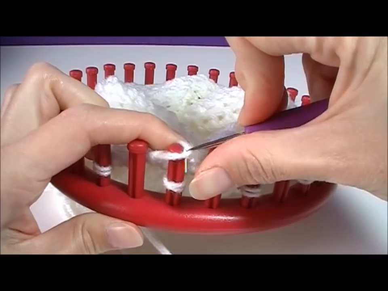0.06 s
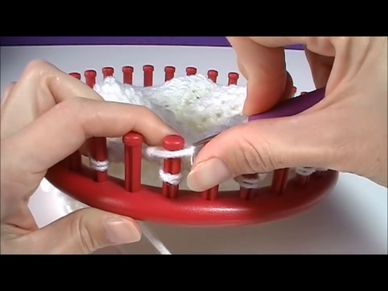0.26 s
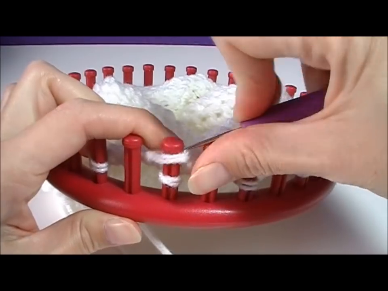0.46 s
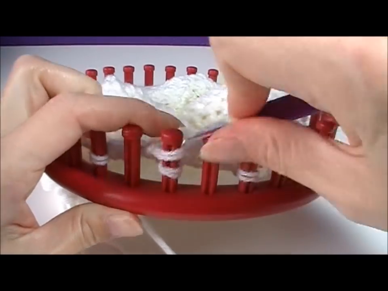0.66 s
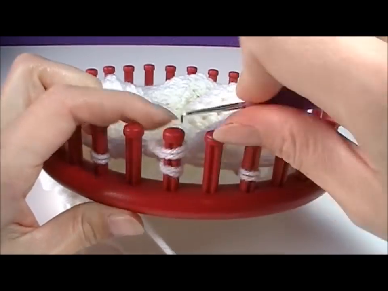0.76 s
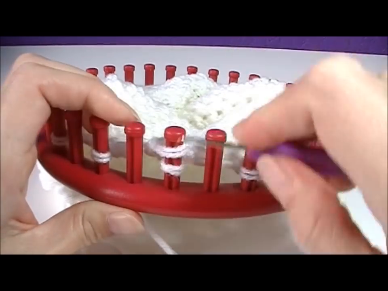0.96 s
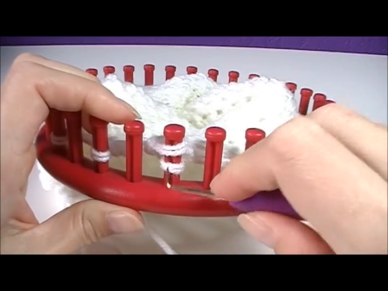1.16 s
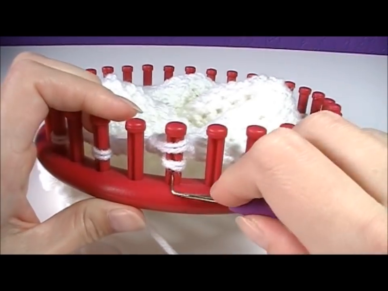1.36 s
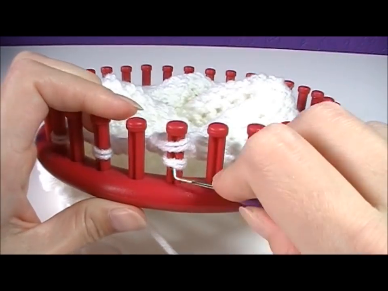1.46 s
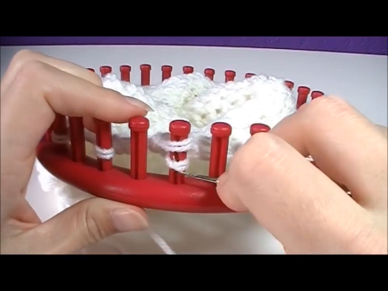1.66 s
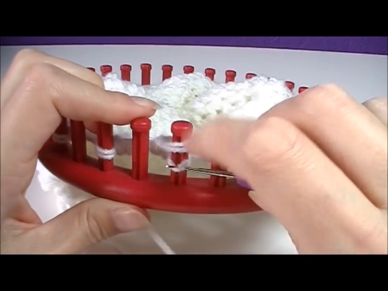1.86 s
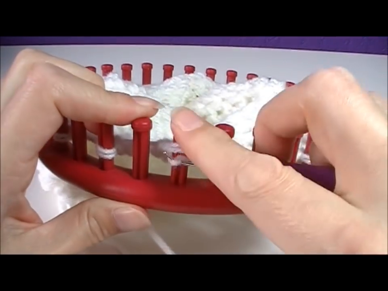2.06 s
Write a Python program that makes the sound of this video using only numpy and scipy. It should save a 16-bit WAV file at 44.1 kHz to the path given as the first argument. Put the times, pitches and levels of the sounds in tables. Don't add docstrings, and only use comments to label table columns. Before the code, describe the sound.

A metal hook ticks on plastic pegs close up: one loud sharp snap with a woody table boom near the start, a smaller click, then faint taps, knocks and yarn rustle in a quiet, hissy room.

```python
import sys
import numpy as np
from scipy import signal
from scipy.fft import rfft, irfft, next_fast_len
from scipy.io import wavfile
from scipy.ndimage import map_coordinates

SR = 44100
rng = np.random.default_rng(int(sys.argv[2]) if len(sys.argv) > 2 else 0)


def attenuation_scalar(level_db):
    decades = np.asarray(level_db, float) / 20
    return 10 ** decades


def wav_record(signal):
    frames = np.transpose(np.atleast_2d(signal))
    bounded = np.clip(frames, -1, 1)
    quanta = np.round(bounded * 32767).astype(np.int16)
    wavfile.write(sys.argv[1], SR, quanta)


N = 92610
BAND_TOP_HZ = 15500


def unit(x):
    return x / np.sqrt(np.mean(x ** 2) + 1e-20)


def along(points, hz):
    f, v = np.transpose(points)
    return np.interp(np.log(hz + 1), np.log(f + 1), v)


def wobble(rate):
    knots = rng.standard_normal(int(N * rate / SR) + 4)
    return map_coordinates(knots, [np.arange(N) * rate / SR])


def filtered(x, response):
    m = next_fast_len(N + SR // 2)
    hz = np.fft.rfftfreq(m, 1 / SR)
    return irfft(rfft(x, m) * response(hz), m)[..., :N]


def add(track, s, sound):
    part = track[round(s * SR):][:len(sound)]
    part += sound[:len(part)]


def rush(gain, alike):
    def mid_side_gain(hz):
        turn = np.arccos(np.clip(along(alike, hz), -1, 1)) / 2
        return gain(hz) * [np.cos(turn), np.sin(turn)]

    mid, side = filtered(rng.standard_normal((2, N)), mid_side_gain)
    return unit(np.array([mid + side, mid - side]))


def resonances(peaks):
    def response(f):
        total = 0
        for k, (centre, width, db) in enumerate(peaks):
            total = total + (-1) ** k * attenuation_scalar(db) * 1j * f * width / (centre ** 2 - f ** 2 + 1j * f * width)
        return total

    return response


# f/Hz, density/dB per Hz
HISS = [(18, -45), (30, -3), (102, 0), (171, -5), (253, -3), (524, -10.5), (698, -10.5), (15000, -34)]
# f/Hz, likeness [-1..1]
ALIKE = [(60, 0.57), (180, -0.62), (550, -0.92), (1650, -0.6), (4970, 0.18), (15000, -0.6)]


def background():
    hiss_db = -44.5 + 0.4 * wobble(2.68)
    hiss = attenuation_scalar(hiss_db) * rush(lambda hz: attenuation_scalar(along(HISS, hz)) * (hz < BAND_TOP_HZ), ALIKE)
    table = resonances([(hz, 4 / t60, db) for hz, db, t60 in TABLE])
    hum_db = -57 - 0.5 * wobble(11.7)
    return hiss + attenuation_scalar(hum_db) * rush(lambda hz: np.abs(table(hz)), [(200, 0.31)])


# t/s, level/dB
YARN = [(0, -57), (.14, -62.5), (.19, -52), (.3, -53), (.34, -63), (.46, -57.5), (.56, -53.5), (.66, -55.5),
        (.76, -54), (.81, -63), (1.03, -59), (1.08, -73), (1.55, -63.5), (1.82, -58), (1.92, -60.5),
        (1.97, -55), (2.029, -52), (2.07, -50.5)]
# f/Hz, density/dB per Hz
FIBRE = [(1000, -5), (2500, -9), (5000, -16.5), (8000, -11), (11000, -5.5), (13500, -13), (15500, -31)]


def yarn():
    grain_db = 1.5 * wobble(40) + 2 * wobble(300)
    pull_db = np.interp(np.arange(N) / SR, *np.transpose(YARN))
    rustle = rush(lambda hz: attenuation_scalar(along(FIBRE, hz)) * (hz < BAND_TOP_HZ), [(8000, 0.82)])
    return attenuation_scalar(pull_db + grain_db) * rustle


# t/s, peak level/dB, brightness/dB per octave, share of free ring time left by the hands
KNOCKS = [(.001, -34, 0, 0.31), (0.234, -24.5, 2, 0.21), (.24, -15, 1.5, 0.72), (.507, -28, 1.5, 0.63),
          (0.726, -48, -11, 0.36), (0.7736, -27.5, 3, 0.6), (1.234, -45.5, -3, 0.46), (1.554, -39, 1, 0.44),
          (1.572, -36, 2, 0.49), (1.62, -37.5, 4, 0.61), (1.672, -28.5, 0, 0.44), (1.7, -35, -7, 0.17),
          (1.722, -31.5, 7, 0.35), (1.755, -33, 6, 0.3), (1.778, -37.5, 0, 0.77), (1.82, -39, -3.5, 0.92),
          (1.944, -42, 1, 0.79), (1.985, -35, -6, 0.3), (2.009, -39, -8, 0.58)]
# f/Hz, level/dB, t60/s
TABLE = [(127.1, 2, 0.36), (177.2, -10, .35), (237, -5.5, 0.072), (331.5, -3.5, 0.23), (381, -6.5, .18),
         (425, -6, 0.25), (460.9, -6, 0.19), (525, -10.5, 0.15), (584, -11.5, 0.074), (738, -7, 0.1),
         (851, -12.5, 0.15), (898, -12.5, .12), (1120, -18.5, 0.057), (1500, -16.5, 0.026)]
# f/Hz, level/dB, t60/s
LEANED_ON = [(129.7, -3, 0.41), (179.5, -3, 0.28), (224, -3, 0.23), (319.5, -5.5, 0.24), (371.3, -4, 0.3),
             (470, -10.5, .15), (700, -7, 0.076)]
LEAN_FROM_S = 1.5
CONTACT_MS, BRIGHT_TOP_HZ = 0.69, 380


def knocks():
    out, t = np.zeros(N), np.arange(SR // 2) / SR
    push = np.sin(np.pi * np.clip(t[:400] * 1000 / CONTACT_MS, 0, 1)) ** 2
    for s, db, bright_db, free in KNOCKS:
        modes = LEANED_ON if s > LEAN_FROM_S else TABLE
        hz, table_db, t60 = np.transpose(modes)[..., None]
        tilt_db = bright_db * np.log2(np.minimum(hz, BRIGHT_TOP_HZ) / hz[0])
        level_db = table_db + tilt_db + rng.normal(0, 2, hz.shape)
        tuned_hz = hz * (1 + rng.normal(0, .006, hz.shape))
        decay = attenuation_scalar(level_db - 60 * t / (free * t60))
        onset = 1 - np.exp(-t / 0.00081)
        ring = (decay * np.sin(2 * np.pi * tuned_hz * t) * onset).sum(axis=0)
        sound = -np.convolve(ring, push)[:len(t)]
        add(out, s, attenuation_scalar(db) * sound / np.abs(sound).max())
    return out


# t/s, peak level/dB, centre of the ring f/Hz, spread/octaves, t60/s
TAPS = [(.226, -36, 8950, 0.54, .03), (0.2318, -18, 9900, 0.56, 0.041), (0.2334, -21, 2540, 0.41, 0.0083),
        (0.2369, -1.5, 9250, 0.33, 0.0047), (.2373, -12.5, 4230, 0.27, 0.017),
        (0.2366, -17, 1340, 0.74, 0.023), (0.5014, -14.5, 7400, 0.1, 0.0052),
        (0.5009, -24.5, 3000, 0.38, 0.012), (0.5612, -34.5, 10300, 0.4, 0.014),
        (0.571, -42, 12500, 0.33, 0.01), (.648, -39, 6000, 0.87, .01), (.6985, -27.5, 6400, 0.84, .015),
        (0.7534, -36.5, 3300, 0.73, 0.018), (1.311, -33, 11300, 0.39, 0.011),
        (1.3114, -44, 4600, .9, 0.0099), (1.386, -34.5, 4530, 0.45, 0.012), (1.447, -50, 9000, .4, 0.012),
        (1.476, -42, 8500, 0.46, .015), (1.588, -38, 10600, 0.46, 0.0097),
        (1.826, -30.5, 11200, 0.48, 0.0074), (1.981, -34, 11900, .2, .01),
        (2.006, -23.5, 11900, 0.42, .006), (2.0108, -36, 12000, 0.26, .007),
        (2.066, -36.5, 11500, 0.42, 0.058)]
# f/Hz, level/dB
PEG = [(1500, -3.5), (2400, 4), (3200, 14.5), (4500, 12.5), (5400, -14), (6600, 8.5), (7500, 1.5),
       (9000, -47), (10000, -5.5), (11100, 4), (12300, -4), (13600, -17)]
CRACK, RATTLE, RATTLE_LASTS = 0.75, 0.11, 6.2


def taps():
    out, t = np.zeros(N), np.arange(4096) / SR
    hz, peg_db = np.transpose(PEG)
    noise_hz = np.fft.rfftfreq(len(t), 1 / SR)
    for s, db, centre_hz, spread, t60 in TAPS:
        def near(f):
            octaves = np.log2((f + 1) / centre_hz)
            return np.exp(-.5 * (octaves / spread) ** 2) * (f < BAND_TOP_HZ)

        gains = near(hz) * attenuation_scalar(peg_db + rng.normal(0, 2, len(hz)))
        tuned_hz = hz * (1 + rng.normal(0, .03, len(hz)))
        ring = gains @ np.sin(2 * np.pi * tuned_hz[:, None] * t) / gains.sum()
        crack = .5 * unit(irfft(rfft(rng.standard_normal(len(t))) * near(noise_hz)))
        sound = (ring + CRACK * crack) * attenuation_scalar(-60 * t / t60)
        sound += RATTLE * crack * attenuation_scalar(-60 * t / (RATTLE_LASTS * t60))
        sound *= 1 - np.exp(-t / 0.00005)
        add(out, s, attenuation_scalar(db) * sound / np.abs(sound).max())
    return out


def stroke(start_s, len_s, db, peaks):
    u = np.clip((np.arange(N) / SR - start_s) / len_s, 0, 1)
    slips_per_s = 1200
    slips = (rng.random(N) < slips_per_s / SR) * rng.standard_normal(N)
    slips += 0.15 * rng.standard_normal(N)
    swell = np.sin(np.pi * u) ** 0.75
    return attenuation_scalar(db + 1.6 * wobble(59.15)) * swell * unit(filtered(slips, resonances(peaks)))


def yarn_squeak():
    return stroke(.64, 0.051, -54, [(3540, 500, 0)])


# f/Hz, width/Hz, level/dB
SCRAPED = [(720, 91, 1.5), (1560, 160, -12), (2230, 450, -9), (4970, 3900, -20.5), (9200, 3700, -18)]


def hook_scrape():
    return stroke(1.422, 0.081, -44.5, SCRAPED)


def ports(x, lean_db, lag_rad):
    half = attenuation_scalar(lean_db / 2) * np.exp(-.5j * lag_rad)
    return filtered(x, lambda hz: np.array([[half], [1 / half]]) * (hz > 0))


# f/Hz, t60/s
ROOM = [(200, 0.27), (2000, 0.43), (10000, .15)]


def room(x):
    hz, t, z = signal.stft(rng.standard_normal((2, SR // 2)), SR, nperseg=256)
    fading = z * attenuation_scalar(-60 * t / along(ROOM, hz)[:, None])
    tail = signal.istft(fading, SR, nperseg=256)[1]
    late = np.pad(x, (200, 0))[None]
    return signal.fftconvolve(late, tail / np.linalg.norm(tail[0]), axes=1)[:, :N]


def scene():
    booms = knocks()
    rubs = yarn_squeak() + hook_scrape()
    ticks = taps() + filtered(rubs, lambda hz: hz < BAND_TOP_HZ)
    loom = ports(ticks, lean_db=1.5, lag_rad=1.3) + ports(booms, lean_db=7.5, lag_rad=0.79)
    echo = room(attenuation_scalar(-15.5) * ticks + attenuation_scalar(-9.5) * booms)
    return loom + echo + yarn() + background()


def low_pass(x):
    return signal.sosfilt(signal.butter(12, 16660, fs=SR, output="sos"), x)


BASS_CUT_HZ, TOP_HZ = 75, 16500
DUCK_S, DUCK_DB, DUCK_RISE_S, DUCK_BACK_S = .24, -5.5, 0.047, 0.26


def record(dry):
    x = filtered(dry, lambda hz: (1j * hz / (BASS_CUT_HZ + 1j * hz)) ** 2 * (hz < TOP_HZ))
    t = np.maximum(np.arange(N) / SR - DUCK_S, 0)
    duck_db = DUCK_DB * (1 - np.exp(-t / DUCK_RISE_S)) * np.exp(-(t / DUCK_BACK_S) ** 2)
    return low_pass(x * attenuation_scalar(duck_db))


dry = scene()
out = record(dry)
wav_record(out)
```